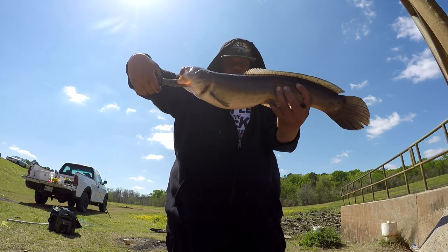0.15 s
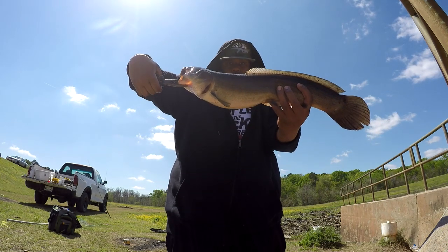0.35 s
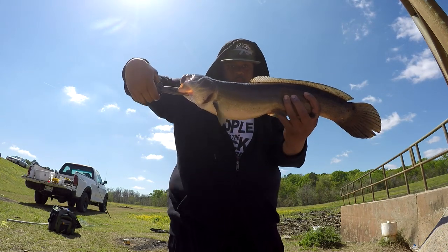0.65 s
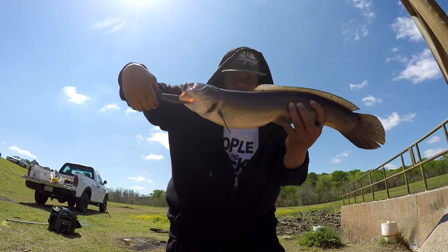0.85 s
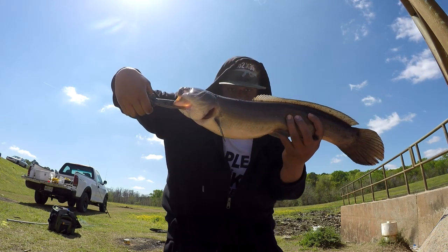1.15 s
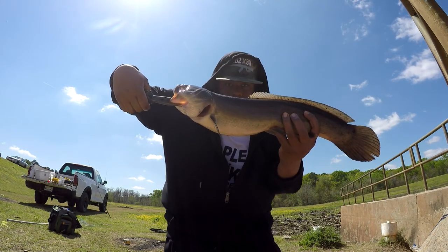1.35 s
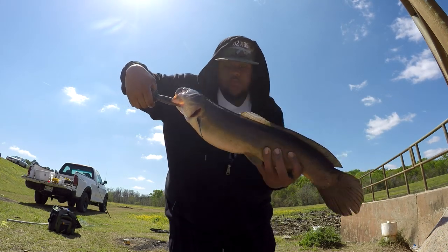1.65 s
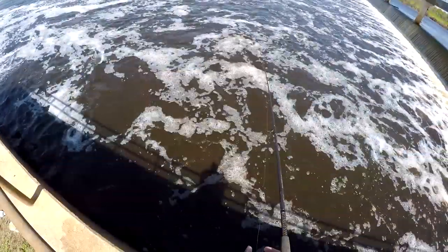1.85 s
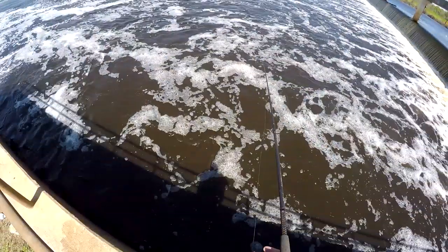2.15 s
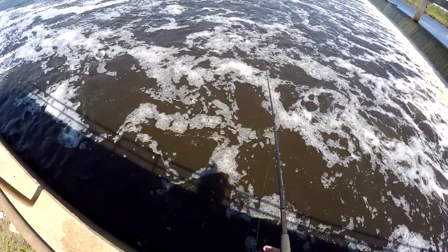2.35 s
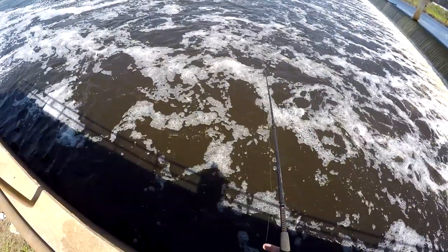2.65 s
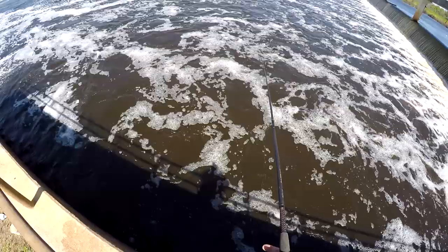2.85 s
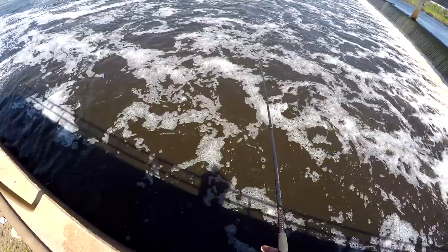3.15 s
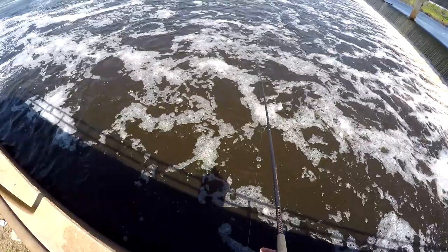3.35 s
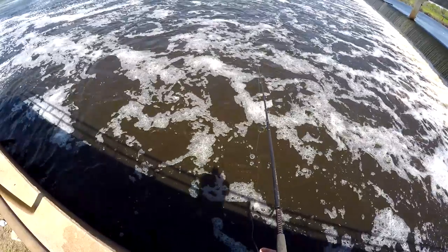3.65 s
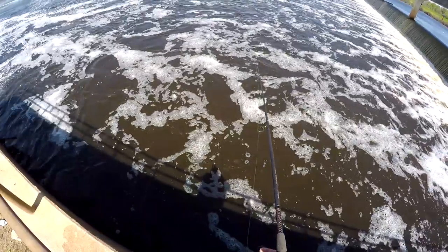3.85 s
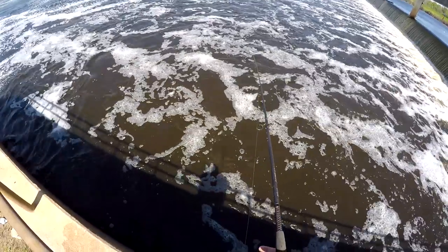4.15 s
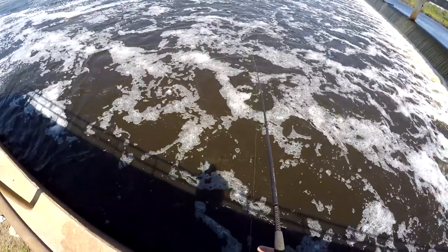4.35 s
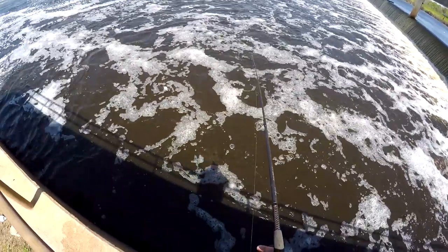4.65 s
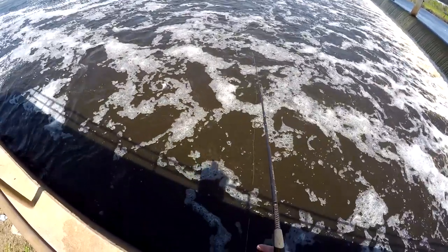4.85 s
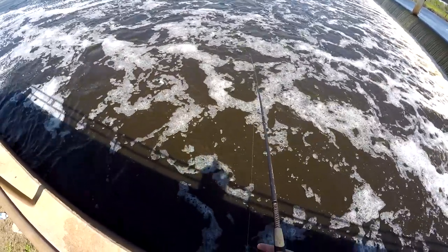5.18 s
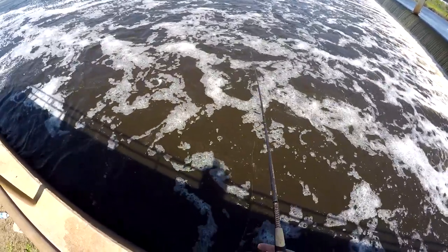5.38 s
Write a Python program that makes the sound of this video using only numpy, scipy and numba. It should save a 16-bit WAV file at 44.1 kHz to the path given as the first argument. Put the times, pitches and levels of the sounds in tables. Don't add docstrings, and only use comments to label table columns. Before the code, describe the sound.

Outdoors on a grassy bank, turbulent water below a dam outflow makes a continuous hissing roar while wind flutters low against a small microphone. At about 1.75 seconds the scene blends to a wall right above the water: the rush gets louder and brighter, and heavier gusts thump and slap the microphone until the end.

```python
import sys
import numpy as np
from scipy import signal
from scipy.fft import rfft, irfft
from scipy.io import wavfile
from scipy.ndimage import uniform_filter1d
from numba import njit

SR = 44100
rng = np.random.default_rng(int(sys.argv[2]) if len(sys.argv) > 2 else 0)


def log_audio(samples):
    frames = np.atleast_2d(samples).T
    limited = np.clip(frames, -1, 1)
    pcm = np.round(limited * 32767).astype(np.int16)
    wavfile.write(sys.argv[1], SR, pcm)


def linear_from_db(decibels):
    return 10 ** (np.asarray(decibels, float) / 20)


N = 243431
CHURN_TOP_HZ = 550


def unit(x):
    return x / np.sqrt(np.mean(x ** 2))


def bump(s, half_s):
    return np.exp(-((np.arange(N) / SR - s) / half_s) ** 2)


def nearness():
    move_s, move_length_s = 1.75, 0.2
    progress = (np.arange(N) / SR - move_s) / move_length_s + 0.5
    return np.sin(np.pi / 2 * np.clip(progress, 0, 1)) ** 2


# frequency in Hz, level in dB per Hz.
BANK_ROAR = [(76, -38), (130, -1), (182, -5), (246, 0), (373, -11), (421, -7), (493, -8), (545, -22),
             (678, -16.5), (861, -21.5), (1030, -21), (1300, -23.5), (2200, -27.3), (3300, -27.5),
             (5700, -34), (12100, -44), (15100, -46)]
# frequency in Hz, level in dB per Hz.
WALL_ROAR = [(76, -34), (130, 4), (159, -0.5), (205, -2), (236, -4.5), (345, -6), (412, -9.5), (556, -12),
             (651, -15), (896, -13), (1180, -18), (1690, -21.5), (3080, -22), (11000, -38.5), (15100, -43)]


def water():
    centres = 150 * 2 ** np.arange(0, 7, 0.25)
    bank_db, wall_db = share_db(BANK_ROAR, centres), share_db(WALL_ROAR, centres)
    near = nearness()
    churn_db, rush_db = churn_level(near), rush_level(near)
    local_db = splashes(centres) + gurgles(centres)
    octave = np.log2(np.arange(N // 2 + 1) * SR / N + 1e-9)
    hiss = rfft(rng.standard_normal(N))
    cloud = rfft(bubbles(count=90000, cycles=7.2, glide=0.28, spread_db=1.76))
    swell, spray = walk(22.69), walk(45)
    regions = [walk(30) for _ in range(7)]
    out = np.zeros(N)
    for k, hz in enumerate(centres):
        window = np.cos(np.pi / 2 * np.clip(4 * (octave - np.log2(hz)), -1, 1)) ** 2
        band_hiss = unit(irfft(hiss * window, N))
        band_bubbles = unit(irfft(cloud * window, N))
        band = unit(band_hiss + linear_from_db(-6.5) * band_bubbles)
        db = 0.03 * swell + 0.3 * regions[k // 4] + 0.18 * walk(24.0)
        db = db + 0.74 * hz / (hz + 9000) * spray
        db = db + local_db[k] + (churn_db if hz < CHURN_TOP_HZ else rush_db)
        out += band * linear_from_db(db + near * wall_db[k] + (1 - near) * bank_db[k])
    return out


def share_db(spectrum, centres):
    hz, db = np.transpose(spectrum)
    power = centres * linear_from_db(2 * np.interp(np.log(centres), np.log(hz), db))
    deep = centres < CHURN_TOP_HZ
    total = np.where(deep, power[deep].sum(), power[~deep].sum())
    return 10 * np.log10(power / total)


def bubbles(count, cycles, glide, spread_db):
    when, pitch, luck = rng.random((count, 3)).T
    hz = 150 * 100 ** pitch ** 0.4
    size = linear_from_db(-spread_db * np.log(1 - luck))
    return ring((when * N).astype(np.int64), hz, size, cycles, glide)


@njit
def ring(start, hz, size, cycles, glide):
    out = np.zeros(N)
    for e in range(len(start)):
        w = 2 * np.pi * hz[e] / SR
        n = int(cycles * SR / hz[e])
        state = size[e] + 0j
        turn = np.exp(1j * w - 5 / n)
        slide = np.exp(1j * w * glide / n)
        for i in range(start[e], min(start[e] + n, N)):
            state *= turn
            turn *= slide
            out[i] += state.imag
    return out


def walk(rate_hz):
    k = int(SR / rate_hz)
    steps = np.repeat(rng.standard_normal(N // k + 1), k)
    slewed = uniform_filter1d(uniform_filter1d(steps, k), k)[:N]
    return unit(slewed - uniform_filter1d(slewed, 4 * k))


# centre in seconds, change in dB.
CHURN_SURGES = [(.45, 0.5), (.75, -0.5), (1.45, -0.5), (1.99, 3.5), (2.93, 0.5), (3.2, 1), (3.4, -2.5),
                (3.5, 3.5), (4.21, -3), (4.31, 2.5), (4.4, 1), (4.56, 2), (5.46, -3.5)]


def churn_level(near):
    bank_db, wall_db = -32, -30.5
    surge_db = sum(db * bump(s, 0.077) for s, db in CHURN_SURGES)
    return bank_db + near * (wall_db - bank_db) + surge_db


# centre in seconds, half length in seconds, change in dB.
RUSH_LULL = (4.21, 0.13, -0.62)
# centre in seconds, half length in seconds, change in dB.
MIC_TIP = (5.1, 0.63, 0.48)


def rush_level(near):
    bank_db, wall_db = -38, -34
    drift_db = sum(db * bump(s, half_s) for s, half_s, db in (RUSH_LULL, MIC_TIP))
    return bank_db + near * (wall_db - bank_db) + drift_db


# centre in seconds, centre in Hz, change in dB.
SPLASH_EVENTS = [(.07, 7000, -3), (.125, 2000, 3), (.35, 2800, -4), (.43, 1800, 4), (.5, 7000, -3),
                 (.85, 2800, -1.6), (1.56, 7000, 0), (1.67, 2800, -1.6), (1.94, 700, 3), (1.99, 1400, 5),
                 (2.06, 6970, 1.2), (2.13, 698, -2.6), (2.13, 2820, 1.7), (2.18, 7000, -2.2),
                 (2.28, 700, -5), (2.47, 2800, -5), (2.55, 7030, -1.2), (2.65, 1590, -2), (2.89, 2790, 3),
                 (2.96, 7000, 2), (2.97, 696, -4), (3.04, 1415, -4.5), (3.08, 1500, 4), (3.1, 7000, -1.5),
                 (3.14, 2800, 1.4), (3.19, 1390, -2.2), (3.45, 7010, 3.5), (3.5, 2800, -1.5),
                 (3.57, 704, 3), (3.78, 7000, 3.2), (3.8, 1400, 2.5), (3.96, 2790, 0), (4.12, 6960, 2.5),
                 (4.15, 2800, -2.3), (4.31, 705, 5), (4.36, 4000, 2.5), (4.38, 702, -6.5),
                 (4.55, 7000, -2.8), (4.66, 4000, 4), (4.9, 2805, 3.5), (5.08, 6950, -1.1),
                 (5.44, 7010, 0.5), (5.47, 697, -6)]


def splashes(centres):
    return patches_db(centres, SPLASH_EVENTS, half_s=0.014, octaves=0.37)


# centre in seconds, centre in Hz, change in dB.
GURGLE_EVENTS = [(.08, 228, 1.5), (.3, 230, -1), (.48, 225, 5.5), (.6, 330, 6), (.35, 700, 1),
                 (.45, 1000, 2.5), (.95, 460, 3), (1.3, 272, 4), (1.4, 480, 6), (1.99, 201, 2.5),
                 (2.15, 350, 4), (2.15, 190.4, 6), (2.3, 337.8, 3.5), (2.65, 1592, 2), (2.95, 560, 3.5),
                 (3.07, 1500, 1), (3.1, 280.6, 3), (3.55, 458, 3), (3.6, 160.3, -0.5), (3.9, 380.5, -5),
                 (4.2, 351, -0.5), (4.45, 159.1, 0), (4.7, 170, 1), (5.0, 900.6, 0.5), (5.35, 160.5, 0.5),
                 (5.3, 1000, 2.5)]


def gurgles(centres):
    return patches_db(centres, GURGLE_EVENTS, half_s=0.063, octaves=0.16)


def patches_db(centres, table, half_s, octaves):
    s, hz, db = np.transpose(table)
    reach = db * np.exp(-(np.log2(centres[:, None] / hz) / octaves) ** 2)
    return reach @ np.array([bump(at, half_s) for at in s])


# level on the bank in dB, level on the wall in dB, share of the buffets in dB.
BREEZE = [
    (-40, -29.5, -13.5),
    (-38, -31.5, -9),
    (-33.5, -31, -13),
]


def wind():
    blows = buffets()
    wake_length = int(0.1 * SR)
    wake = uniform_filter1d(uniform_filter1d(blows ** 2, wake_length), wake_length)
    large = gusts(wake, BREEZE[0]) * eddies(16.5, 47.7, steady=0.3, hold_s=0.057)
    middle = gusts(wake, BREEZE[1]) * eddies(36.8, 68.6, steady=0.36, hold_s=0.046)
    small = gusts(wake, BREEZE[2]) * eddies(64.5, 128.5, steady=0.22, hold_s=0.036)
    return blows + large + middle + small


def gusts(wake, breeze):
    bank_db, wall_db, share = breeze
    power = linear_from_db(2 * (bank_db + nearness() * (wall_db - bank_db)))
    return np.sqrt(power + linear_from_db(2 * share) * np.abs(wake))


def eddies(lo_hz, hi_hz, steady, hold_s):
    edges = signal.butter(2, [lo_hz, hi_hz], "band", fs=SR, output="sos")
    x = unit(signal.sosfilt(edges, rng.standard_normal(N)))
    size = np.sqrt(uniform_filter1d(x ** 2, int(hold_s * SR)) + 0.046)
    return unit(signal.sosfilt(edges, x / size ** steady))


# centre in seconds, peak in dB, pitch in Hz.
BANK_EDDIES = [(0.014, -19.5, 58), (0.061, -26, 74.4), (0.132, -14, 31.3), (0.205, -17.0, 44.6),
               (0.259, -19, 37.3), (0.313, -19.5, 74.3), (0.328, -16.5, 37), (0.398, -29, 34),
               (0.442, -21.5, 21.8), (0.491, -32, 67.5), (0.534, -19, 44), (0.574, -15, 49.4),
               (0.586, -28, 22), (0.646, -16.5, 29), (0.669, -15, 68.5), (0.718, -18.2, 36.9),
               (0.721, -21, 88), (0.774, -17.5, 81), (0.804, -31, 26), (0.819, -16.5, 51.6),
               (0.885, -19, 56.6), (0.933, -16.8, 43.8), (0.969, -26, 58), (1.008, -18, 68.4),
               (1.033, -16, 87.8), (1.046, -17, 44.2), (1.139, -17, 40), (1.146, -16, 73.8),
               (1.183, -27, 34.3), (1.183, -22, 80.4), (1.207, -16.4, 21.8), (1.218, -20, 80.8),
               (1.248, -25, 81.5), (1.262, -21, 34), (1.354, -16, 34.1), (1.421, -22, 37.2),
               (1.467, -21, 39.7), (1.546, -17, 81), (1.585, -19, 55.7), (1.596, -20.5, 28.8),
               (1.649, -18.5, 57.3), (1.669, -18.5, 24)]
# centre in seconds, peak in dB, pitch in Hz.
WALL_EDDIES = [(1.72, -23, 40), (1.787, -15, 52), (1.799, -14.5, 30.86), (1.838, -11, 48), (1.938, -14, 44),
               (1.976, -12, 68.4), (1.985, -8, 36.9), (2.025, -16.5, 67.6), (2.044, -8, 29.1),
               (2.051, -18, 52), (2.086, -10, 40), (2.136, -24, 34), (2.171, -10.9, 43.54),
               (2.214, -14.5, 33.7), (2.253, -16, 81), (2.266, -12.5, 24.1), (2.281, -9.0, 62),
               (2.306, -15.7, 62.1), (2.362, -15.5, 30.8), (2.416, -14.5, 34.2), (2.427, -15.6, 74),
               (2.476, -18, 37.1), (2.523, -7.5, 47.5), (2.6, -17, 36.8), (2.65, -21, 48),
               (2.692, -17.5, 73.7), (2.729, -18, 40.3), (2.776, -23, 24), (2.834, -12.5, 67.1),
               (2.858, -9.5, 48.4), (2.878, -22, 62.3), (2.902, -17.5, 30.93), (2.926, -13, 68.4),
               (2.957, -21.3, 21.9), (2.977, -19, 52.4), (3.044, -14.5, 40.5), (3.052, -16, 81.3),
               (3.084, -15, 61.9), (3.1, -28, 23.8), (3.121, -10.5, 40.4), (3.156, -17.5, 52),
               (3.163, -18, 29.1), (3.21, -19, 68), (3.243, -11.5, 36.8), (3.331, -15, 47.8),
               (3.418, -10.5, 52.1), (3.459, -14, 51.7), (3.514, -24, 33.7),
               (3.591, -14, 47.9), (3.638, -13.2, 47.2), (3.701, -15, 39.7), (3.754, -15, 23.94),
               (3.792, -19, 62), (3.839, -11.5, 36.8), (3.88, -14.5, 56.7), (3.966, -16, 62.25),
               (3.975, -15, 31), (4.044, -12.5, 56.9), (4.06, -27, 22), (4.085, -8, 37),
               (4.137, -10.5, 44.5), (4.161, -21, 22), (4.257, -15, 51.86), (4.298, -17.5, 22.13),
               (4.31, -9.5, 73), (4.349, -5.5, 52.2), (4.4, -9, 43.8), (4.437, -10.5, 61.1),
               (4.464, -9.5, 37.1), (4.507, -5.5, 40), (4.517, -17.5, 81), (4.528, -20.5, 34.15),
               (4.555, -9, 67.8), (4.596, -19, 57.15), (4.635, -19.5, 31), (4.637, -18.5, 68),
               (4.666, -7.5, 56.6), (4.673, -18, 21.97), (4.721, -7, 47.96), (4.762, -22, 26.1),
               (4.796, -15, 51.8), (4.875, -15, 33.9), (4.906, -20.5, 51.7), (4.945, -12, 29.07),
               (4.984, -18, 51.97), (5.021, -13.5, 48.4), (5.059, -18.0, 56.9), (5.116, -18, 68.6),
               (5.201, -23, 47.4), (5.238, -10.5, 56.9), (5.357, -16, 34.1), (5.418, -12, 30.88),
               (5.467, -14.5, 51.4)]


def buffets():
    t = np.arange(N) / SR
    out = np.zeros(N)
    for s, db, hz in BANK_EDDIES + WALL_EDDIES:
        span = slice(max(int((s - 4 / hz) * SR), 0), int((s + 4 / hz) * SR))
        cycles = (t[span] - s) * hz
        swing = linear_from_db(db - 0.7) * np.exp(2j * np.pi * cycles - (cycles / 0.83) ** 2)
        phase = np.angle(np.vdot(swing, out[span])) + 0.8 * rng.standard_normal()
        out[span] += (swing * np.exp(1j * phase)).real
    return out


# centre in seconds, peak in dB, half length in seconds.
PORT_SLAPS = [
    (1.993, -25, 0.014),
    (2.03, -32, 0.021),
    (2.287, -38, 0.017),
    (3.105, -31.5, 0.04),
    (4.443, -32.5, 0.081),
    (4.53, -33.5, 0.036),
    (5.406, -31, 0.084),
    (1.28, -32.5, 0.06),
]


def slaps():
    size = sum(linear_from_db(db) * bump(s, half_s) for s, db, half_s in PORT_SLAPS)
    return size * eddies(84, 168, steady=0.89, hold_s=0.02)


def scene():
    return (water() + wind() + slaps())[None]


def roll_off(x):
    return signal.sosfilt(signal.butter(12, 15290, fs=SR, output="sos"), x)


def record(dry):
    mix = np.tanh(1.17 * dry) / 1.162
    return roll_off(mix)


dry = scene()
out = record(dry)
log_audio(out)
```